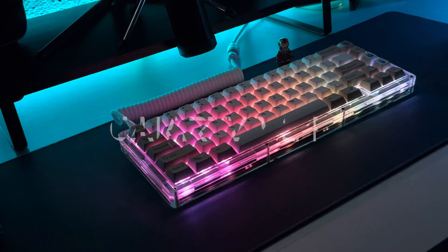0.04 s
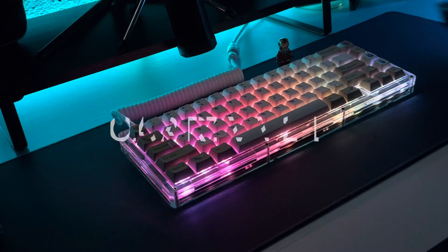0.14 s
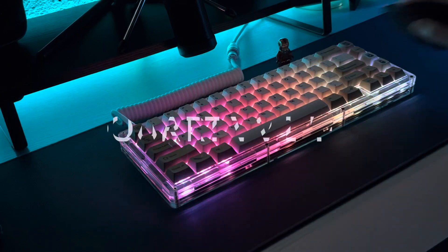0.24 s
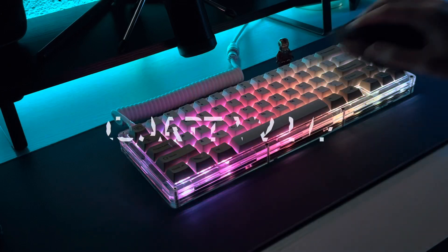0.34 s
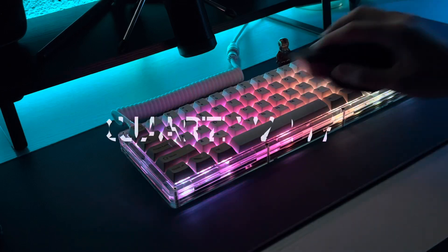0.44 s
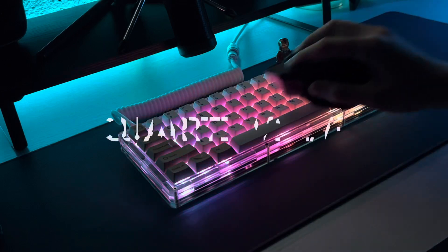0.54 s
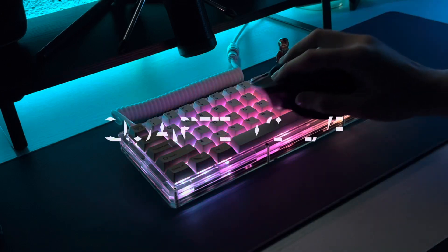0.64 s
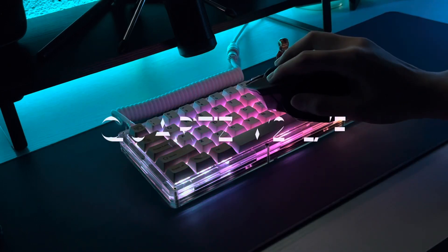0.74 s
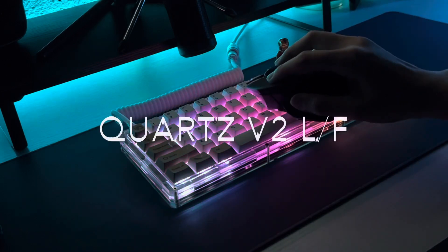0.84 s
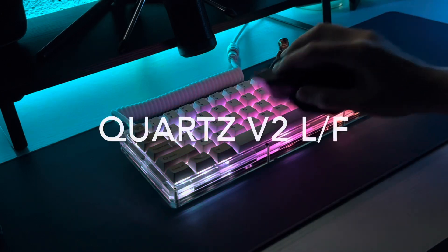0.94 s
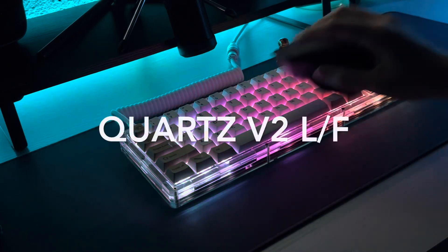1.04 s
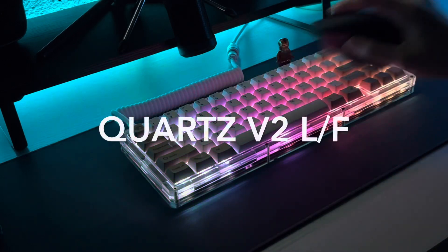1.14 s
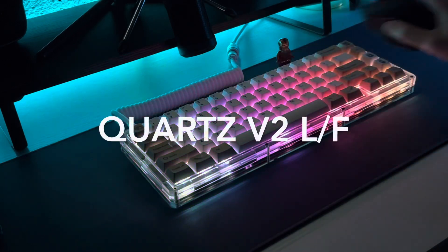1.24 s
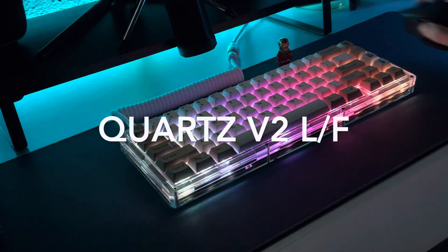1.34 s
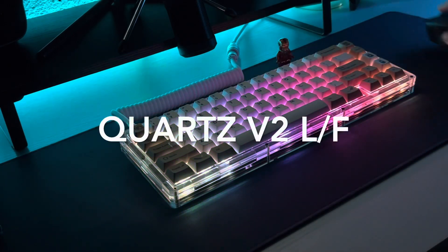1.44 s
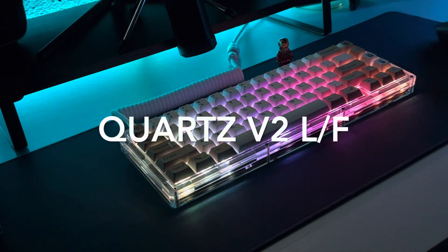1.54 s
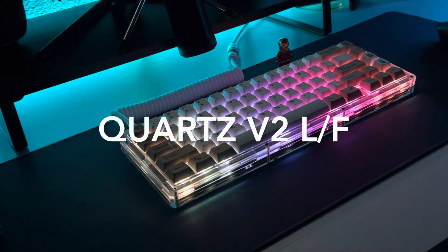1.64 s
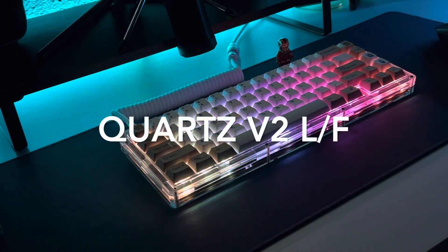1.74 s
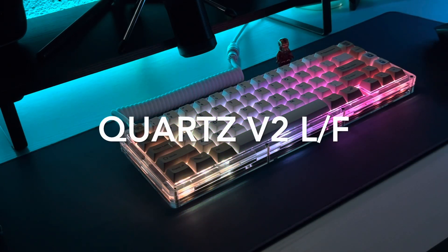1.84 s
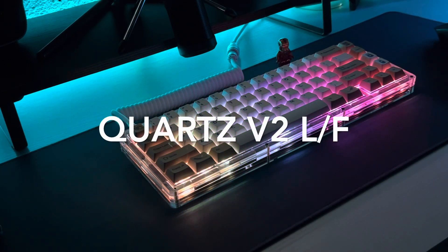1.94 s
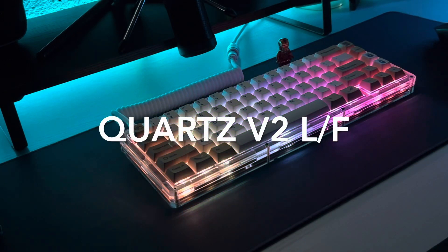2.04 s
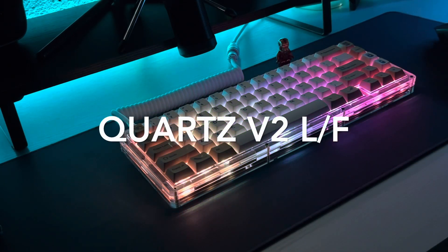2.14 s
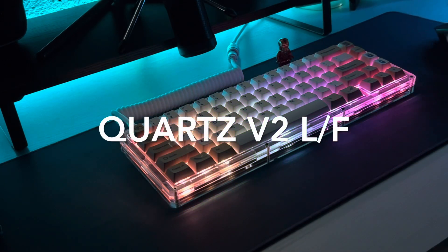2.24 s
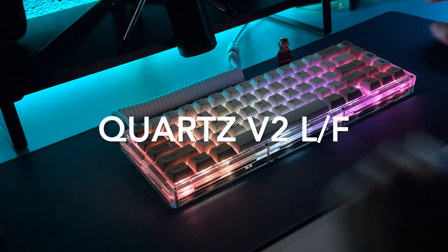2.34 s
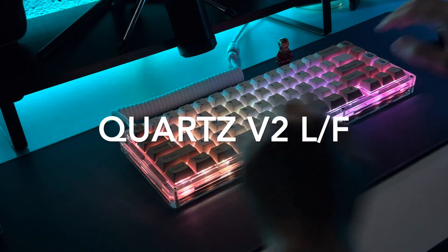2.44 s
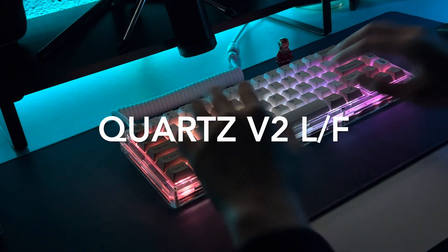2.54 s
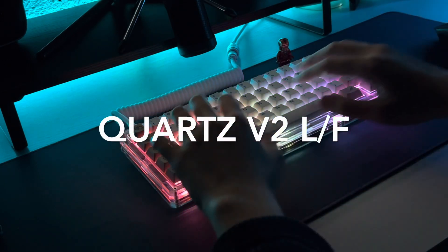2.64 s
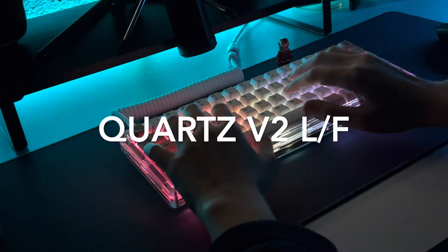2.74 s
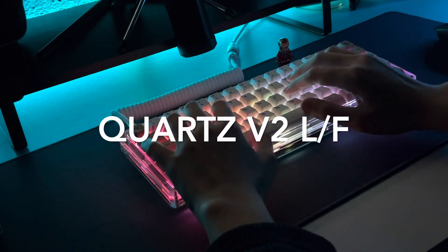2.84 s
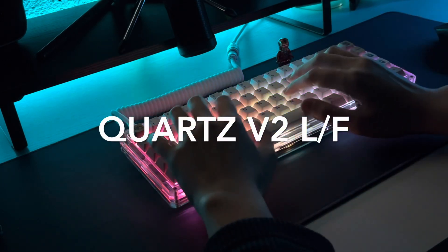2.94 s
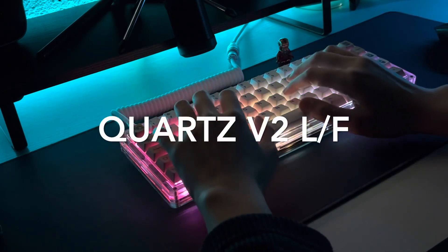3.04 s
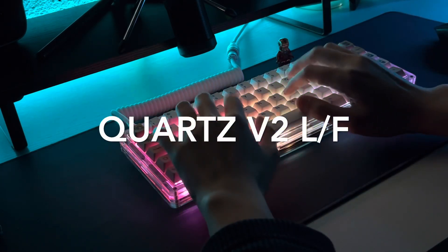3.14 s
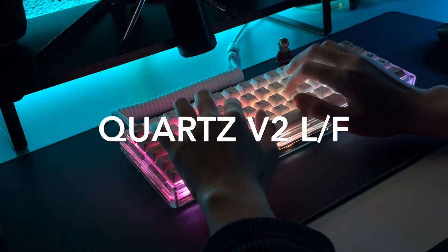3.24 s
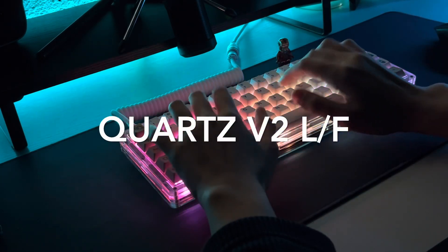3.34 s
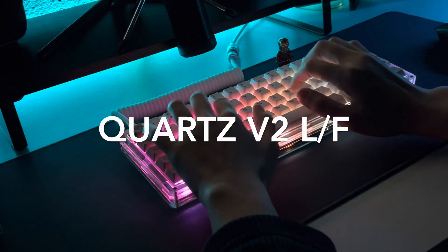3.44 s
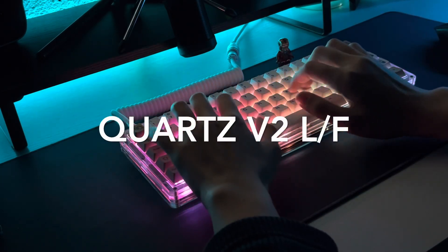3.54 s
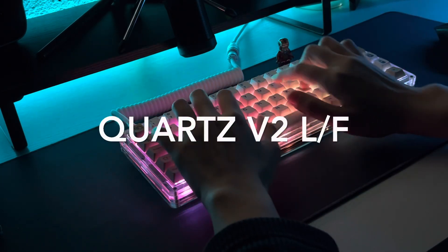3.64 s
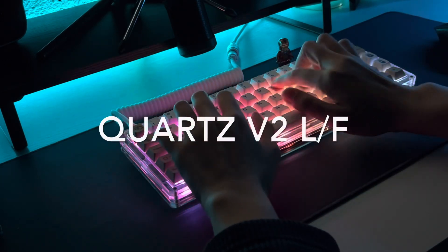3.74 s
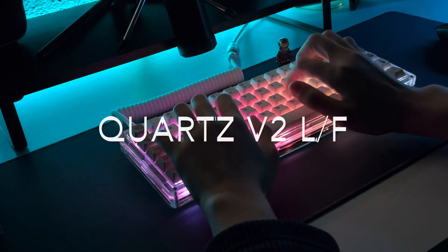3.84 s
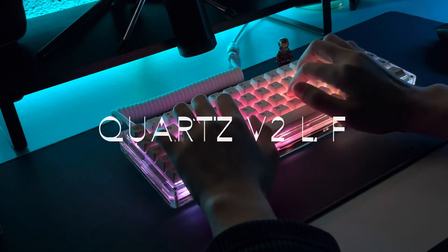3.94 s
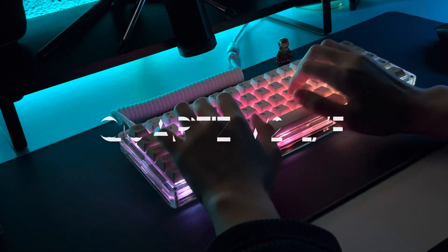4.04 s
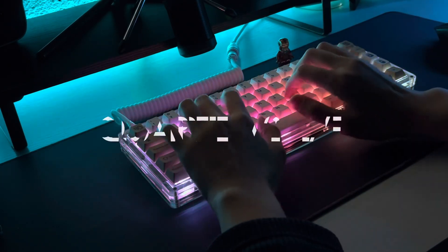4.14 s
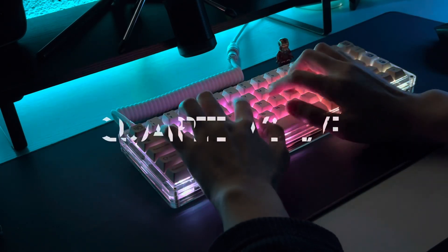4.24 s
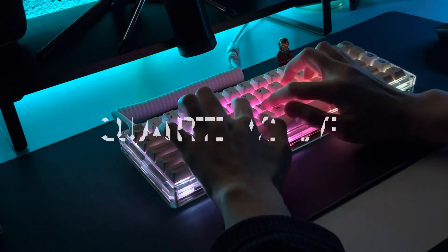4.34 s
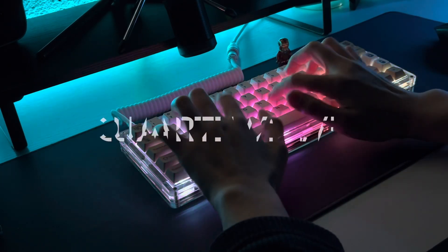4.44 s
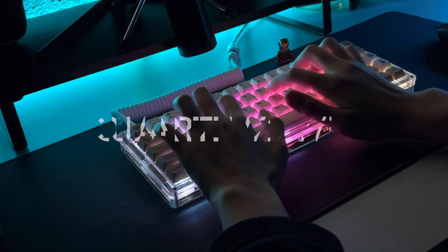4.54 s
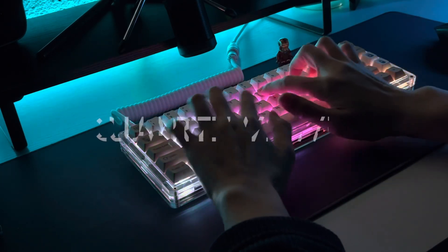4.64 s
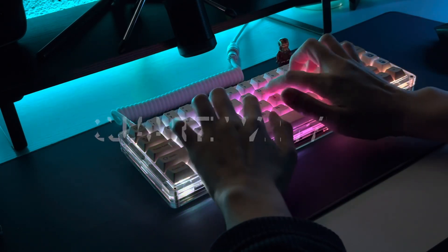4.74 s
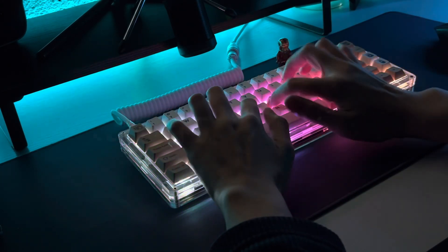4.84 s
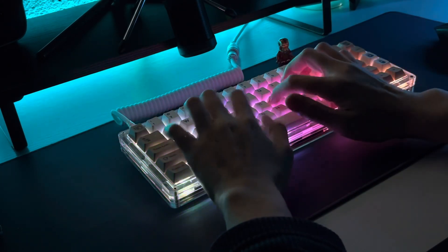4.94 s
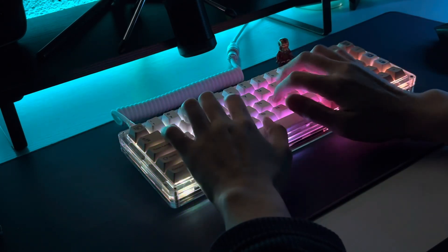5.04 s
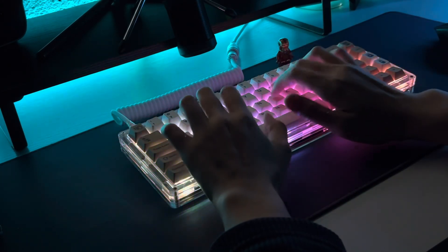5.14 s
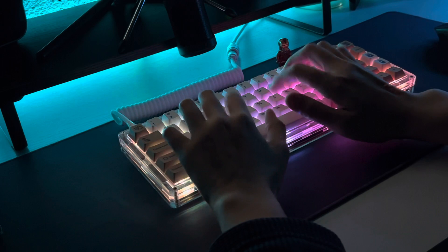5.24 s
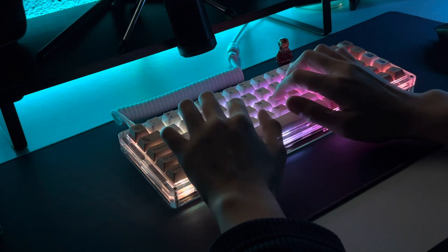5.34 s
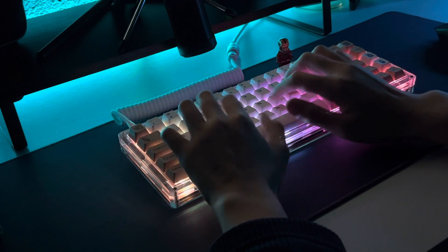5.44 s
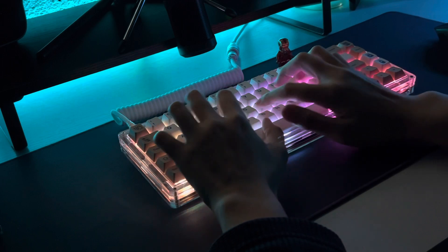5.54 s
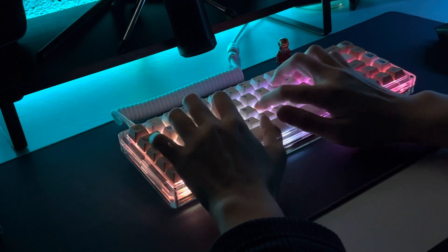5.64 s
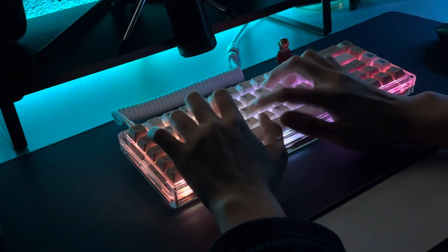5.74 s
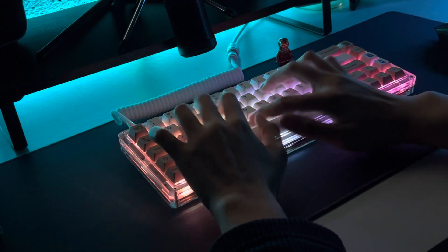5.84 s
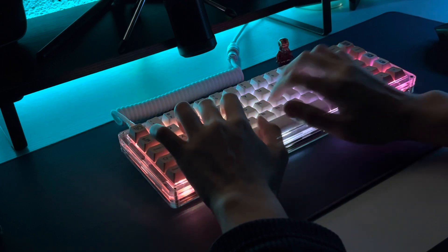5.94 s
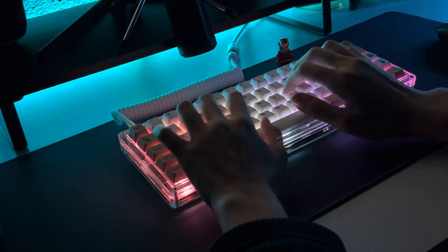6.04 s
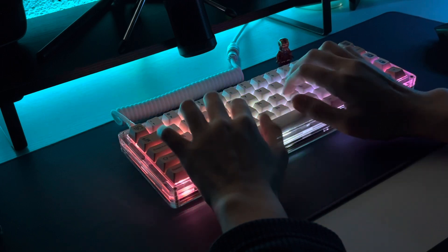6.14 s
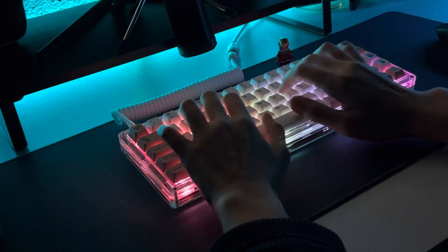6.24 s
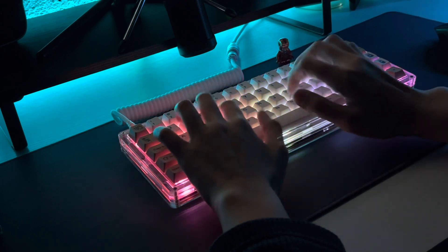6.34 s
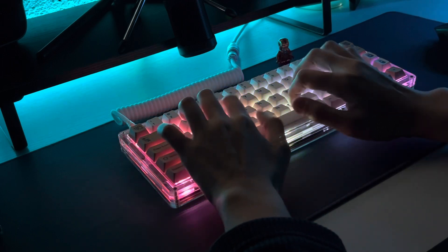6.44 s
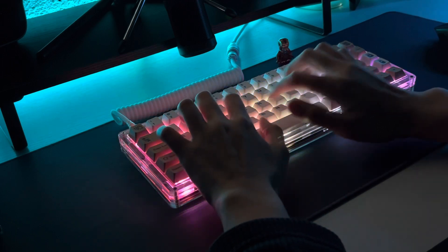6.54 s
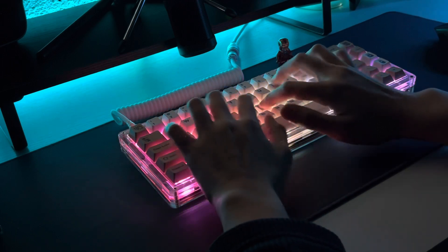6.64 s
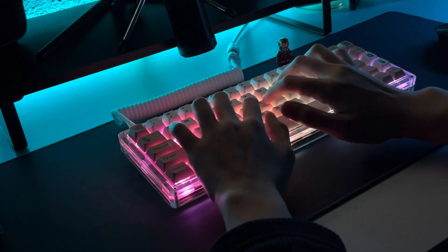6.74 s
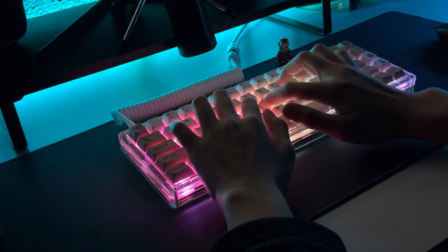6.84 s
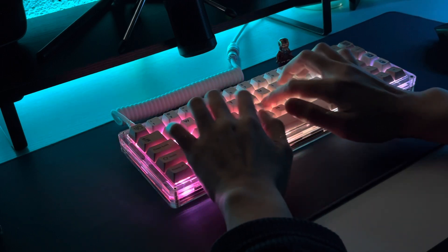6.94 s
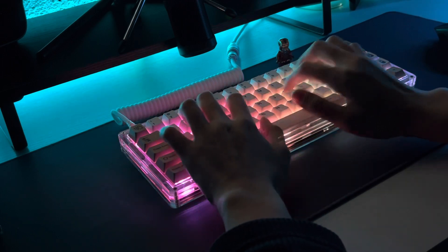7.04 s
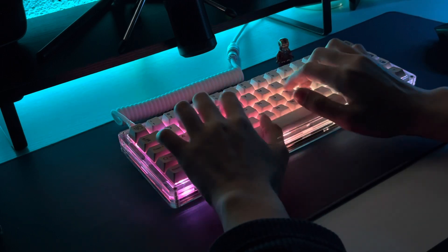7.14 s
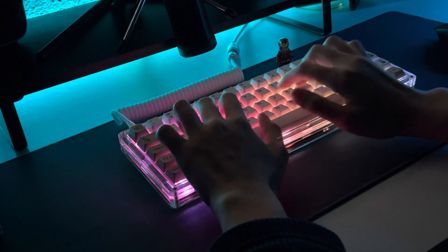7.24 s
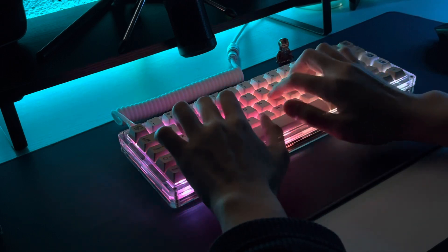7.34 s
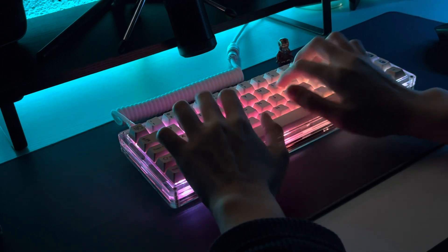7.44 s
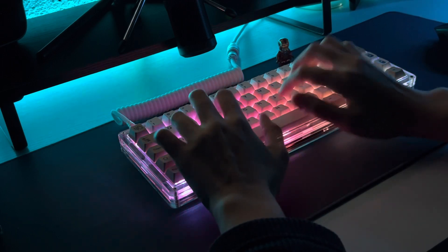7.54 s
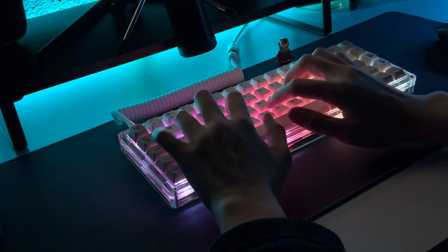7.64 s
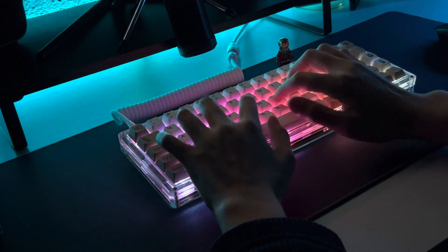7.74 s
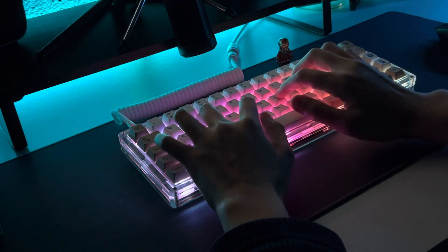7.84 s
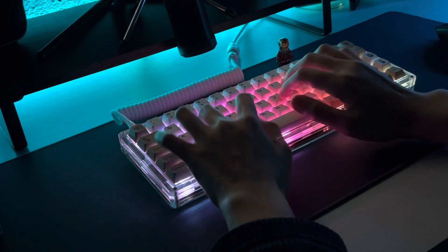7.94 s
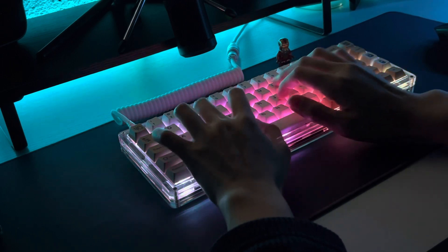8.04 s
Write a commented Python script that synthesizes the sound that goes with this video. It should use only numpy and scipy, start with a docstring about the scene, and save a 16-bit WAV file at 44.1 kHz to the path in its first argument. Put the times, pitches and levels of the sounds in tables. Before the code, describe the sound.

A quiet room, heard from a microphone close to a keyboard on a desk. Soft low-weighted room noise with very faint wavering tones runs throughout. At about 0.6 s a small bright metallic tick sounds, followed by three more between 0.7 and 0.85 s, each with a tiny rattle. A double knock hits the desk at 1.5 and 1.6 s, the first sharper, the second duller. Then a pause, with only a faint low sway around 2.7 to 3 s. From 3.1 s to the end just past 8 s, fast irregular typing: short, damped plastic clacks varying in pitch and sharpness, with faint fingertip ticks and stem rubs. Deeper, ringing space bar strokes fall near 3.5, 4.1, 4.3, 5.4, 5.9, 6.5, 7.0 and 8.0 s. Heavier presses thud softly through the desk, and short diffuse room decays follow.

```python
"""A desk in a quiet room, the microphone standing close to a damped mechanical keyboard on the same top.
Four light metallic ticks and a double knock on the desk come first, then a pause, then fast typing.
Each key is a short plastic clack, a filtered click that lands twice; the space bar is deeper and rings.
Fingertips tick faintly on the caps, and the desk sways under the hands as slow swings of its low modes.
Behind it lies shaped room noise with faint wavering tones; short diffuse decays answer the blows."""
import sys
import numpy as np
from scipy import signal
from scipy.fft import rfft, irfft, next_fast_len
from scipy.io import wavfile
from scipy.ndimage import uniform_filter1d

SR = 44100
rng = np.random.default_rng(int(sys.argv[2]) if len(sys.argv) > 2 else 0)


def waveform_to_disk(signal):
    """Save audio, clipped to [-1, 1], as 16-bit WAV at the path in sys.argv[1]."""
    frames = np.transpose(np.atleast_2d(signal))
    scaled = np.clip(frames, -1, 1) * 32767
    samples = np.round(scaled).astype(np.int16)
    wavfile.write(sys.argv[1], SR, samples)


N = 356769  # length [samples]
TAPS = 4096  # length of one click [samples]
HZ = np.fft.rfftfreq(TAPS, 1 / SR)
# Levels of single blows are relative; colours and modes set how loud each one sounds.


def amp(db):
    """Decibels to amplitude."""
    return 10 ** (np.asarray(db) / 20)


def evened(x):
    """Scale to an RMS of one."""
    return x / np.sqrt(np.mean(x ** 2) + 1e-20)


def read(points, hz):
    """A curve joined by straight lines on a log-frequency axis."""
    f, value = np.transpose(points)
    return np.interp(np.log(hz + 1), np.log(f + 1), value)


def add(mix, s, sound):
    """Lay a sound into the mix from time s [s]."""
    part = mix[max(round(s * SR), 0):][:len(sound)]
    part += sound[:len(part)]


def lowpass(x, hz, order):
    """Remove what lies above a corner."""
    sections = signal.butter(order, min(hz, SR / 2 - 1), fs=SR, output="sos")
    return signal.sosfilt(sections, x)


def highpass(x, hz, order):
    """Remove what lies below a corner."""
    return signal.sosfilt(signal.butter(order, hz, "highpass", fs=SR, output="sos"), x)


def bell(hz, width_hz):
    """A resonance peak of height one along the spectrum."""
    return 1 / (1 + (2 * (HZ - hz) / width_hz) ** 2)


def treble():
    """The part of the spectrum that a harder contact lifts."""
    return 1 / (1 + (3200 / (HZ + 1)) ** 4)


def click(colour_db):
    """The sharpest causal blow with this spectrum: its minimum-phase impulse."""
    both_sides_db = np.r_[colour_db, colour_db[-2:0:-1]]
    log_gain = np.log(amp(both_sides_db))
    spectrum = np.exp(np.conj(signal.hilbert(log_gain)))
    return irfft(spectrum[:len(HZ)])


def ring(modes, detune=0.):
    """Half a second of dying sines, each detuned by a random share at each blow."""
    t = np.arange(SR // 2) / SR
    out = np.zeros(len(t))
    for hz, db, t60 in modes:
        mode_hz = hz * (1 + detune * rng.standard_normal())
        out += amp(db - 60 * t / t60) * np.sin(2 * np.pi * mode_hz * t)
    return out


def scatter(level_db, t60, delay):
    """The direct blow, then its quick scatter through case and desk as dying noise."""
    t = np.arange(TAPS // 2) / SR
    path = amp(-60 * t / t60) * rng.standard_normal(len(t))
    path *= t > delay
    path *= amp(level_db) / (np.linalg.norm(path) + 1e-12)
    path[0] = 1  # the direct blow
    return path


def rattle(rows, bands):
    """Loose metal buzzes briefly after each blow: dying noise in narrow bands."""
    out = np.zeros(N)
    t = np.arange(TAPS) / SR
    for s, db, *_ in rows:
        for hz, width_hz, band_db, t60 in bands:
            noise = rfft(rng.standard_normal(TAPS))
            chatter = evened(irfft(noise * bell(hz, width_hz) ** 2))
            add(out, s, amp(db + band_db - 60 * t / t60) * chatter)
    return out


# Quiet room, spectrum of its noise: (frequency [Hz], relative density [dB per Hz])
AIR_COLOUR = [(47, -45), (80, -4), (139, 3), (159, -10.5), (309, -7), (353, -8.5), (378, -13), (601, -14),
              (802, -20.5), (2130, -27.5), (2270, -27), (3030, -29), (8990, -36), (14000, -39.5),
              (16000, -51)]
# Faint wavering tones in the room noise: (frequency [Hz], level [dB])
WAVERING_TONES = [(137, -84), (288, -79.5), (350, -75), (2346, -89), (10999, -105), (11999, -105)]
AIR_DB = -65.5


def air():
    """Soft room noise, plus narrow bands of noise heard as faint wavering tones."""
    size = next_fast_len(N, True)
    hz = np.fft.rfftfreq(size, 1 / SR)

    def noise(gain):
        return evened(irfft(rfft(rng.standard_normal(size)) * gain, size)[:N])

    out = amp(AIR_DB) * noise(amp(read(AIR_COLOUR, hz)))
    for tone_hz, db in WAVERING_TONES:
        out += amp(db) * noise(1 / (1 + ((hz - tone_hz) / 9) ** 2))
    return out


# Reverberation of the room: (frequency [Hz], t60 [s])
ROOM_DECAY = [(150, 0.95), (1000, 0.29), (2500, 0.27), (6000, 0.19), (14000, 0.4)]


def tail():
    """A diffuse noise decay with a 5 ms fade-in, each band dying at its own speed."""
    hz, t, bands = signal.stft(rng.standard_normal(SR // 2), SR, nperseg=256)
    bands = bands * amp(-60 * t / read(ROOM_DECAY, hz)[:, None])
    decay = signal.istft(bands, SR, nperseg=256)[1]
    decay *= np.clip(np.arange(len(decay)) / SR / 0.005, 0, 1)
    return decay / np.linalg.norm(decay)


def room(x, count=4):
    """Several diffuse decays trade places steadily, so successive blows get differing echoes."""
    turn = 2 * np.pi * 1.3 * np.arange(N) / SR  # the shares turn at 1.3 Hz
    out = np.zeros(N)
    for k in range(count):
        share = np.cos(turn + np.pi * k / count) * np.sqrt(2 / count)
        out += signal.fftconvolve(x * share, tail())[:N]
    return out


# An arm leans on the desk without a blow: (time [s], push [dB])
LEANS = [(0.0, -58), (2.71, -49), (2.96, -54.5)]
BAR_LAG_S = 0.014  # the thumb leans on the space bar a little later than a finger on a key
THUMP_PUSH_DB = -38.5  # push of a knock or heavy press, relative to its level


def pushes():
    """Everything that sets the desk moving: rows (time [s], push [dB])."""
    keys = [(s, push_db) for s, *_, push_db in KEYS]
    spaces = [(s + BAR_LAG_S, push_db) for s, *_, push_db in SPACES]
    thumped = [(s, db + THUMP_PUSH_DB) for s, db, _ in THUMPS]
    return keys + spaces + thumped + list(LEANS)


CREST_S = 0.046  # the desk swings widest this long after a push


def swell(gain_db, rise, t60, rest_db):
    """Size of the desk's swing: each push builds to a crest and dies away, and their energies add."""
    t = np.arange(N) / SR
    coarse = t[::100]
    start, db = np.transpose(pushes())[:, :, None]
    since = coarse - start - CREST_S
    growth = np.exp(-(since / rise) ** 2)
    decay = amp(-60 * (np.hypot(since, rise) - rise) / t60)
    shape = np.where(since < 0, growth, decay)
    energy = ((amp(db + gain_db) * shape) ** 2).sum(0) + amp(rest_db) ** 2
    return np.interp(t, coarse, np.sqrt(energy))


def swinging(modes, low_hz, top_hz):
    """Finger blows and the restless weight of the hands swing the desk's lowest modes, at unit size."""
    push = 0.0089 * rng.standard_normal(N)
    for s, db, *_ in list(KEYS) + list(SPACES) + list(THUMPS):
        add(push, s, np.atleast_1d(amp(db / 2)))
    motion = signal.fftconvolve(push, ring(modes))[:N]
    motion = highpass(lowpass(motion, top_hz, order=8), low_hz, order=4)
    envelope = abs(signal.hilbert(motion, next_fast_len(N))[:N])
    power = uniform_filter1d(envelope ** 2, size=2200)
    return motion / np.sqrt(abs(power) + 1e-12)


# Slow sway of the desk: (frequency [Hz], level [dB], t60 [s])
SWAY_MODES = [(39, -13.5, 0.81), (41.93, 3, 0.56)]
# Quicker bounce of the desk: (frequency [Hz], level [dB], t60 [s])
BOUNCE_MODES = [(58.7, -3.5, 1), (63.2, 8.5, 0.81), (67.2, 2.5, 0.75)]


def desk():
    """The same pushes swell a slow sway and a quicker bounce; the desk is never quite still."""
    sway = swinging(SWAY_MODES, low_hz=33.6, top_hz=46.4)
    sway *= swell(gain_db=-3.5, rise=0.074, t60=1, rest_db=-68)
    bounce = swinging(BOUNCE_MODES, low_hz=49.2, top_hz=70.9)
    bounce *= swell(gain_db=4, rise=0.04, t60=0.31, rest_db=-65)
    return sway + bounce


# Knocks and heavy presses that reach the desk top:
# (time [s], level [dB], hardness as a corner frequency [Hz])
THUMPS = [(1.484, -1.5, 513), (1.623, -7.5, 298), (1.64, 1.5, 260), (3.251, 0.5, 100), (3.359, -10, 200),
          (3.641, -7, 297), (3.855, -2.5, 111), (4.438, -8, 180), (4.602, -4.5, 124), (5.09, -5, 280),
          (5.649, -4, 203), (6.374, 0, 140), (7.105, -6, 108), (7.497, -5.5, 200), (8.071, -15, 108)]
# Ringing of the desk top: (frequency [Hz], level [dB], t60 [s])
DESK_MODES = [(93.6, -40.5, 0.28), (169, -39.5, 0.067), (210, -46.5, 0.064), (258, -42.5, 0.051),
              (305, -46.5, 0.078), (376, -44, 0.047), (897, -43.5, 0.052), (1430, -63, 0.031)]
# Sharp edge of the knocks: (time [s], level [dB])
KNOCK_EDGES = [(1.4831, -0.5), (1.636, -13.5)]
# Colour of that edge: (frequency [Hz], level [dB])
EDGE_COLOUR = [(100, -26), (400, -18), (800, -30), (2000, -26), (3600, -33.5), (5000, -45), (9000, -43),
               (15000, -53)]


def thumps():
    """Blows ring the desk top; a softer blow reaches only its low modes."""
    out = np.zeros(N)
    for s, db, corner_hz in THUMPS:
        blow = lowpass(ring(DESK_MODES, detune=0.073), corner_hz, order=2)
        add(out, s, amp(db) * blow)
    for s, db in KNOCK_EDGES:
        path = scatter(level_db=10.0, t60=0.061, delay=0.00042)
        edge = signal.fftconvolve(click(read(EDGE_COLOUR, HZ)), path)
        add(out, s, amp(db - 5.0) * edge)
    return out


# Light metallic ticks: (time [s], level [dB])
TICKS = [(0.5873, -3), (0.7106, 0), (0.7584, -2), (0.848, 0)]
# Quick clink of the thin metal: (frequency [Hz], level [dB], t60 [s])
TICK_CLINK = [(990, -43, 0.0075), (2240, -56.5, 0.018), (3910, -61, 0.027), (4270, -51, 0.012),
              (5200, -48, 0.012), (7700, -61, .018), (8100, -53, 0.012), (8370, -36.5, 0.011),
              (9200, -57, 0.009), (10200, -48.5, 0.0087), (10700, -58, .01), (11800, -49, .008),
              (12600, -55, .01), (15400, -53, 0.007)]
# Its faint after-ring: (frequency [Hz], level [dB], t60 [s])
TICK_MODES = [(4120, -78, 0.22), (7850, -74, 0.21), (8300, -76, 0.17), (8330, -81, 0.25), (10600, -84, .2)]
# Its loose parts chatter on: (frequency [Hz], width [Hz], level [dB], t60 [s])
TICK_RATTLE = [(3940, 1000, -57, 0.023), (6270, 760, -70, 0.18), (8100, 650, -69, 0.22),
               (10400, 500, -79, .15)]


def ticks():
    """Small bright contacts on thin metal: scattered short modes, an after-ring and a rattle."""
    out = np.zeros(N)
    for s, db in TICKS:
        path = scatter(level_db=-2, t60=0.013, delay=0.00033)
        clink = signal.fftconvolve(ring(TICK_CLINK, detune=0.019), path)
        add(out, s, amp(db) * clink)
        add(out, s, amp(db) * ring(TICK_MODES, detune=0.0018))
    return highpass(out, 1420, order=2) + rattle(TICKS, TICK_RATTLE)


# Fainter nudges come by chance just before or after a stroke
NUDGE_CHANCE, NUDGE_NEAR_S, NUDGE_FAR_S = .2, 0.0092, 0.032
NUDGE_DB, NUDGE_SNAP_DB, NUDGE_SPREAD_DB = -24.5, 7.5, 1.5  # means, and the spread of both


def nudges():
    """Around some strokes a finger grazes a neighbouring cap: rows like those of TOUCHES."""
    rows = []
    for s, *_ in list(KEYS) + list(SPACES):
        chance, side, gap = rng.random(3)
        level, snap = NUDGE_SPREAD_DB * rng.standard_normal(2)
        if chance < NUDGE_CHANCE:
            distance = NUDGE_NEAR_S + gap * (NUDGE_FAR_S - NUDGE_NEAR_S)
            offset = np.sign(side - .5) * distance
            rows.append((s + offset, NUDGE_DB + level, NUDGE_SNAP_DB + snap))
    return rows


# The clearer fingertips meeting or leaving a cap: (time [s], level [dB], snap as treble lift [dB])
TOUCHES = [(3.1294, -17.5, 12), (3.3515, -18, 3), (3.4627, -17, -16), (3.498, -16, 3), (3.5454, -14, 0),
           (3.6403, -10.5, -4), (3.72, -15, -2), (3.7751, -14.5, 12), (3.9573, -12.5, -13),
           (4.159, -12.5, -13), (4.3939, -13.5, -6), (4.7053, -17, 3), (4.8603, -15.5, -13),
           (4.9196, -20.5, 10), (4.9317, -11.5, 3), (4.9612, -22.5, 9), (5.2343, -26, 14),
           (5.4297, -21, 11), (5.5864, -14.5, 6), (5.6447, -11.5, 1), (5.7995, -15, -6), (6.095, -15, 4),
           (6.1635, -34, 29), (6.598, -15.5, 11), (6.7077, -13.5, -1), (6.9308, -17, -3), (6.954, -17.5, 9),
           (7.117, -21, 7), (7.2997, -12.5, -20), (7.6398, -10.5, -5.5), (8.0553, -12, -19)]
# Colour of a fingertip on a cap: (frequency [Hz], level [dB])
TOUCH_COLOUR = [(250, -14.5), (700, -0.5), (1100, -0.5), (1450, -8.5), (2200, -2.5), (4000, -22),
                (6500, -37), (9000, -33), (15500, -62)]


def touches():
    """A fingertip nudges a loose cap: a faint, slightly smeared tick."""
    out = np.zeros(N)
    for s, db, snap_db in list(TOUCHES) + nudges():
        tick = click(read(TOUCH_COLOUR, HZ) + snap_db * treble())
        path = scatter(level_db=1.5, t60=0.017, delay=.0004)
        add(out, s, amp(db - 1.5) * signal.fftconvolve(tick, path))
    return highpass(out, 180, order=2)


# Colour of a stem sliding in its housing: (frequency [Hz], level [dB])
SLIDE_COLOUR = [(200, -16), (800, 0), (2300, -1), (3500, -13), (5500, -23), (9000, -16), (15000, -29)]


def slides(rows, level_db, lead):
    """The stem rubs down its housing before it lands: noise growing with time constant lead [s]."""
    out = np.zeros(N)
    t = np.arange(TAPS // 2) / SR
    for s, db, *_ in rows:
        noise = rng.standard_normal(len(t))
        rub = signal.fftconvolve(noise, click(read(SLIDE_COLOUR, HZ)))[:len(t)]
        growth = np.exp(-t[::-1] / lead)
        add(out, s - t[-1], amp(db + level_db) * evened(rub) * growth)
    return out


def unevenness(size):
    """No two strokes sound quite alike: a fresh random ripple along the spectrum, deepest in the treble."""
    ripple = rng.standard_normal(len(HZ))
    for _ in range(2):
        ripple = uniform_filter1d(ripple, size)
    return evened(ripple) * np.clip(HZ / 9000, .1, 1)


def clack(colour_db, rebound_s, share):
    """A stem hits its housing and lands again about a millisecond later, which hollows out the sound."""
    first = click(colour_db + 2.35 * unevenness(size=36))
    dull = 1 / (1 + (HZ / 4000) ** 2)  # the second landing is duller
    late = np.exp(-2j * np.pi * HZ * rebound_s)
    rebound = np.clip(share, 0, .9) * dull * late
    return -irfft(rfft(first, TAPS) * (1 + rebound))[:len(first)]


CAP_WIDTH_HZ = 295  # width of a cap's own resonance, keys and space bar alike
BAR_HZ, BAR_LIFT_DB = 3180, 4.5  # the long cap's own resonance
BAR_REBOUND_S, BAR_REBOUND_SHARE = 0.000787, 0.2  # delay and strength of its second landing
# Space bar strokes: (time [s], level [dB], snap as treble lift [dB], push on the desk [dB])
SPACES = [(3.5148, 7.5, -0.5, -32.5), (4.1152, 1, 0, -35.5), (4.2662, .5, -6.5, -37),
          (5.4497, 4.5, -1, -42.5), (5.949, 6.5, 0, -36), (6.4682, 6.5, -1, -37), (6.973, 6.5, -2, -36),
          (7.9862, 4, -4, -50)]
# Colour of the space bar: (frequency [Hz], level [dB])
BAR_COLOUR = [(80, -22), (250, -21.5), (400, -9), (650, -4), (850, -19), (1400, -7), (2400, -1),
              (3200, -7.5), (3600, -2), (4000, -28), (9000, -33), (10300, -47), (12000, -39.5),
              (15500, -54.5)]
# What rings on after it: (frequency [Hz], level [dB], t60 [s])
BAR_MODES = [(127.4, -46.5, 0.26), (199, -46, 0.088), (298, -49, 0.1), (1640, -59, 0.13), (1990, -61, 0.18),
             (2230, -72.5, 0.275), (2450, -54, 0.13), (3580, -80, 0.06), (3500, -67, 0.0098)]
# Its wire and spring chatter on: (frequency [Hz], width [Hz], level [dB], t60 [s])
BAR_RATTLE = [(3420, 260, -65, 0.057), (5150, 720, -71, 0.19)]


def space_bar():
    """The long cap lands with a deeper clack, rings on and rattles its wire and spring."""
    out = np.zeros(N)
    for s, db, snap_db, _ in SPACES:
        resonance_db = BAR_LIFT_DB * bell(BAR_HZ, CAP_WIDTH_HZ)
        colour_db = read(BAR_COLOUR, HZ) + resonance_db + snap_db * treble()
        blow = clack(colour_db, BAR_REBOUND_S, BAR_REBOUND_SHARE)
        path = scatter(level_db=-7.5, t60=0.0054, delay=0.00081)
        add(out, s, amp(db) * signal.fftconvolve(blow, path))
        add(out, s, amp(db - 3.5) * ring(BAR_MODES, detune=0.0074))
    return highpass(out, 95, order=2) + rattle(SPACES, BAR_RATTLE)


CAP_LIFT_DB = 6.5  # how far each cap's own resonance stands out
KEY_REBOUND_S, KEY_REBOUND_SPREAD = 0.001037, 0.057  # mean delay of the second landing, spread as a share
KEY_REBOUND_SHARE = 0.47  # strength of that second landing
# Key landings and returns, close to the microphone:
# (time [s], level [dB], cap resonance [Hz], snap as treble lift [dB], push on the desk [dB])
KEYS = [(3.1415, -1, 2320, 5.5, -41.0), (3.234, -3.0, 1460, 0, -42), (3.2502, 3, 3530, 7.5, -41),
        (3.3223, -8, 1150, -4, -62.0), (3.3598, 1.5, 1440, -1, -48.5), (3.6702, -1, 2350, 3.5, -36.5),
        (3.8545, 0.0, 3220, 5, -48), (3.9899, 1.5, 1760, 2.5, -36.0), (4.234, 1, 1690, 5, -35),
        (4.2964, 0, 2350, 6.5, -66), (4.3377, -5, 600, 2, -62.0), (4.4356, 1.5, 1520, -4.5, -35.5),
        (4.531, -4.5, 2400, 7, -38), (4.6016, 0.0, 3200, 14, -35.5), (4.6704, -6.5, 1250, -5, -45),
        (4.7395, -2.5, 1640, 0.5, -47.5), (4.8218, -6.0, 1730, 6.0, -41), (5.0881, 1.5, 3600, 3.5, -33.5),
        (5.1557, -8.5, 1530, 3.5, -46), (5.271, -6.5, 3750, -4.5, -38.5), (5.3995, -3.5, 1680, 2, -44),
        (5.567, -3, 2300, 5.5, -42.5), (5.6516, -1.5, 600, 8, -48), (5.7637, 2, 2400, 0.5, -38.0),
        (5.8559, 0.5, 2350, 2.5, -62.0), (5.8639, 0.5, 1690, 0.0, -35), (5.988, -2.5, 600, -9, -35),
        (6.0805, 0.5, 2410, 5.5, -61), (6.1775, 0, 1850, 0.5, -37.0), (6.205, 0.5, 3680, 7, -37),
        (6.268, -8, 1350, 1, -62.0), (6.2921, 1.5, 1550, 0.5, -33.5), (6.3731, -0.5, 2500, 1, -42),
        (6.4558, -5, 660, 0, -34), (6.5812, -1.5, 2370, 6.5, -48), (6.6565, -3.0, 3530, 5, -32.5),
        (6.7463, 1.0, 1920, 1, -37.5), (6.8205, 1, 1740, 8, -33), (6.8327, -0.5, 1800, -5.5, -42),
        (7.0881, -0.5, 3240, 1.5, -34.0), (7.1807, -1, 3500, -6.0, -39.5), (7.4979, -2.5, 604, 8, -42.5),
        (7.7493, -2, 2350, 2.5, -39), (7.8756, 2, 1710, 1.5, -42.5), (7.9422, -3.5, 2290, -6, -36.5),
        (8.0742, 0.5, 3480, 5, -31)]
# Colour of a keycap: (frequency [Hz], level [dB])
KEYCAP_COLOUR = [(80, -24), (250, -25), (520, -10.5), (750, -7), (1100, -4.5), (1400, -9.5), (2200, -5.0),
                 (3000, -12.5), (4200, -21), (6500, -36), (9000, -33), (10500, -46), (12000, -42.5),
                 (15500, -61)]
# What rings on in the case after a key: (frequency [Hz], level [dB], t60 [s])
CASE_MODES = [(168, -60, 0.11), (2410, -80.5, 0.52)]


def keystrokes():
    """Each key clacks with its own cap resonance and snap; the case rings faintly after it."""
    out = np.zeros(N)
    for s, db, cap_hz, snap_db, _ in KEYS:
        rebound_s = KEY_REBOUND_S * (1 + KEY_REBOUND_SPREAD * rng.standard_normal())
        resonance_db = CAP_LIFT_DB * bell(cap_hz, CAP_WIDTH_HZ)
        colour_db = read(KEYCAP_COLOUR, HZ) + resonance_db + snap_db * treble()
        blow = clack(colour_db, rebound_s, KEY_REBOUND_SHARE)
        path = scatter(level_db=-9, t60=0.012, delay=0.00091)
        add(out, s, amp(db) * signal.fftconvolve(blow, path))
        add(out, s, amp(db + 4) * ring(CASE_MODES, detune=.0077))
    return highpass(out, 85, order=2)


def scene():
    """Keyboard, ticks and knocks close by, on a swinging desk in a quiet room."""
    background = air() + desk()
    knocks = thumps()
    metal = ticks()
    spaces = space_bar()
    keys = touches() + slides(KEYS, level_db=-68.0, lead=0.024) + keystrokes()
    to_room = amp(-14.0) * keys + amp(-15.5) * spaces + amp(-15) * metal + amp(-11) * knocks
    return (background + knocks + metal + spaces + keys + room(to_room))[None]


EDGE_HZ = 16000  # upper band edge


def record(dry):
    """The recorder's band limit: a steep linear-phase low-pass."""
    band = signal.firwin(255, EDGE_HZ, window=("kaiser", 8), fs=SR)
    return signal.oaconvolve(dry, band[None], "same")


dry = scene()
out = record(dry)
waveform_to_disk(out)
```